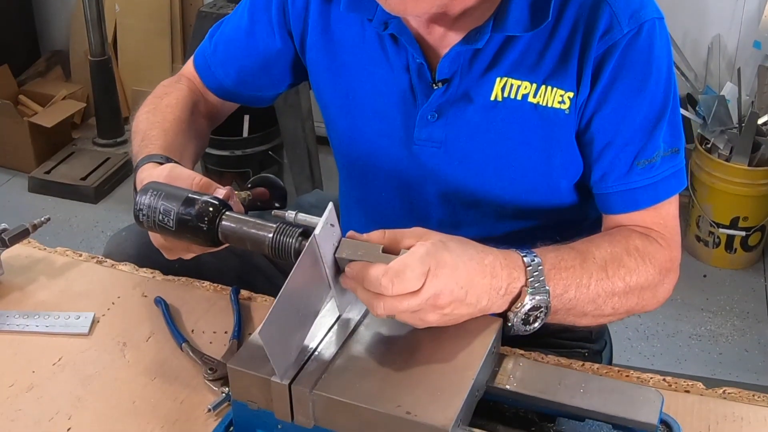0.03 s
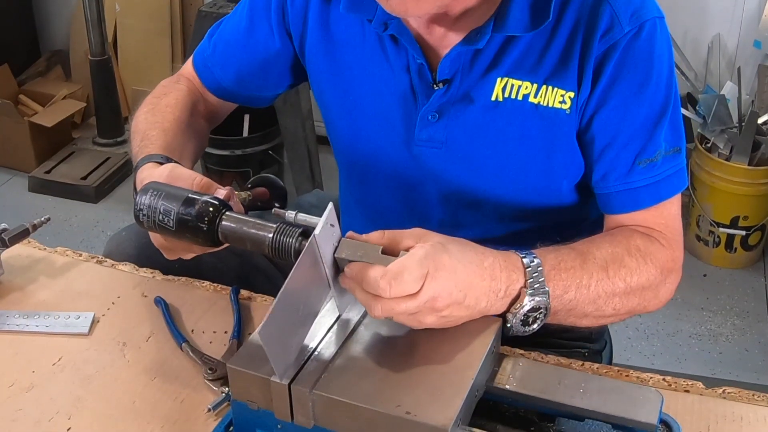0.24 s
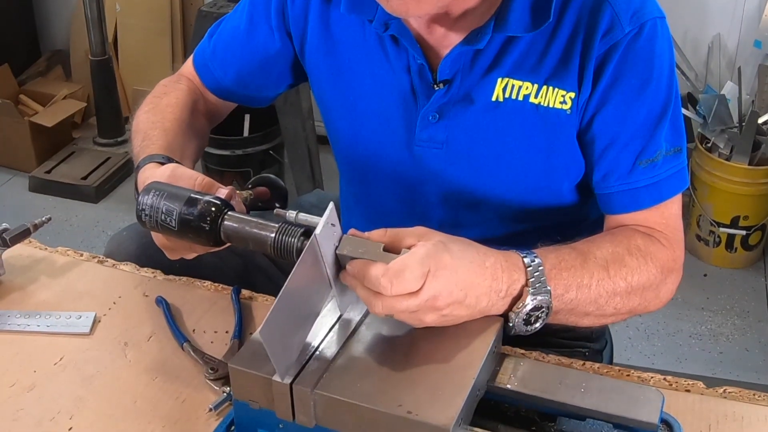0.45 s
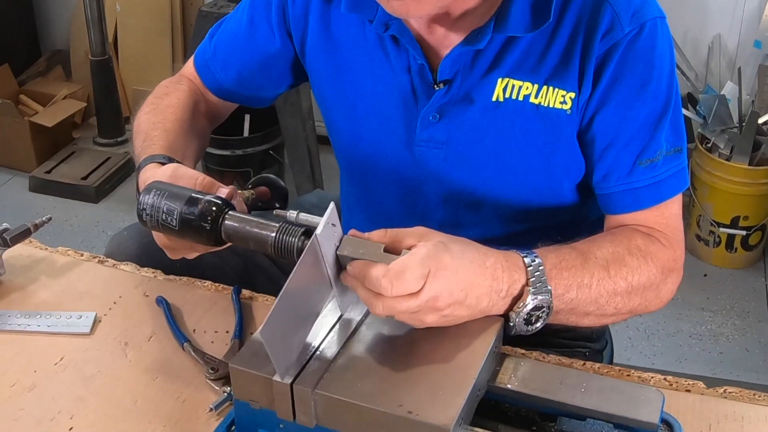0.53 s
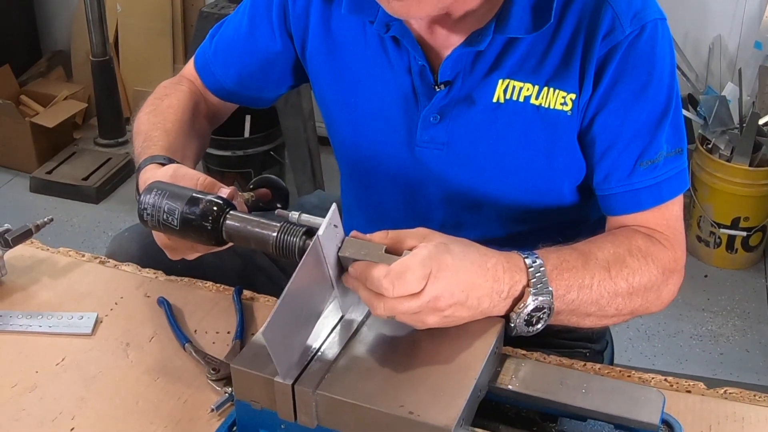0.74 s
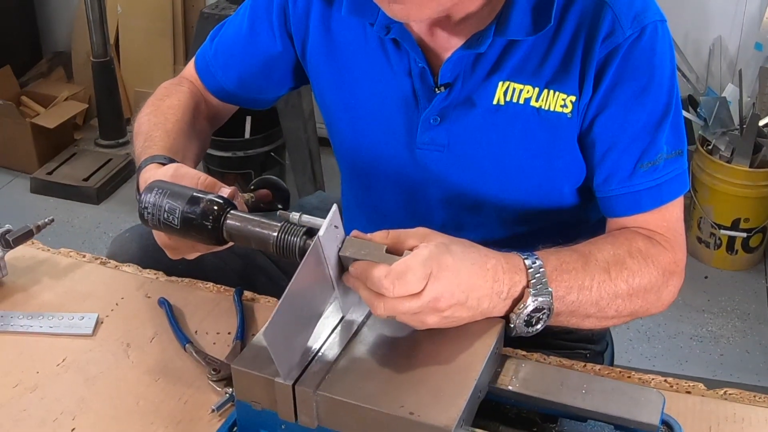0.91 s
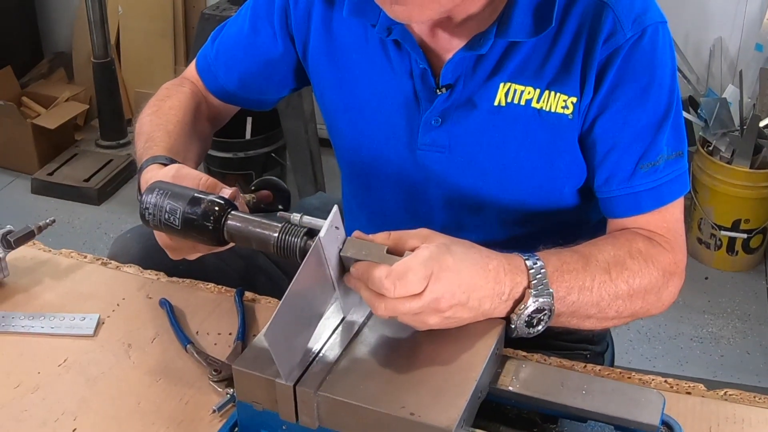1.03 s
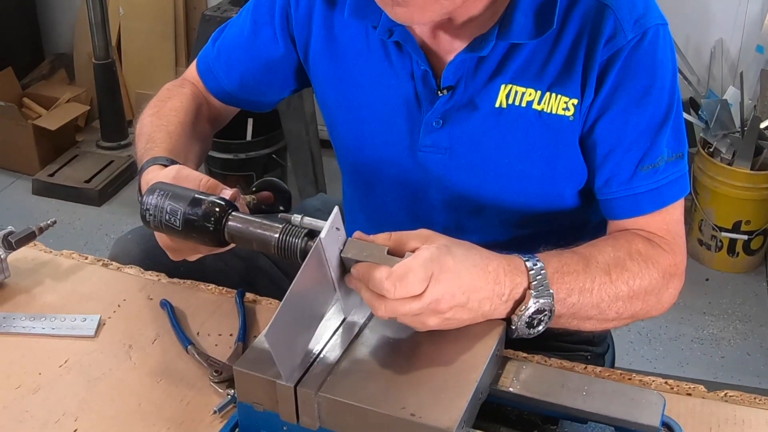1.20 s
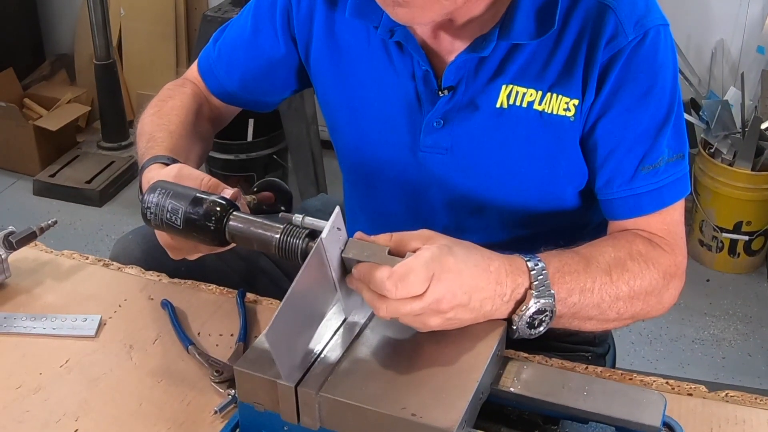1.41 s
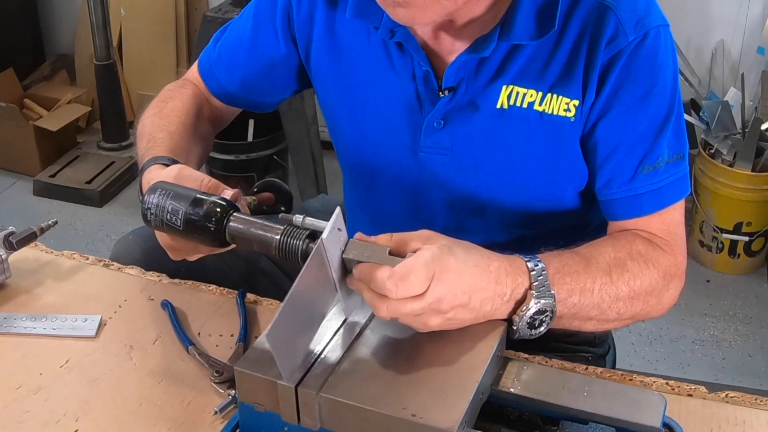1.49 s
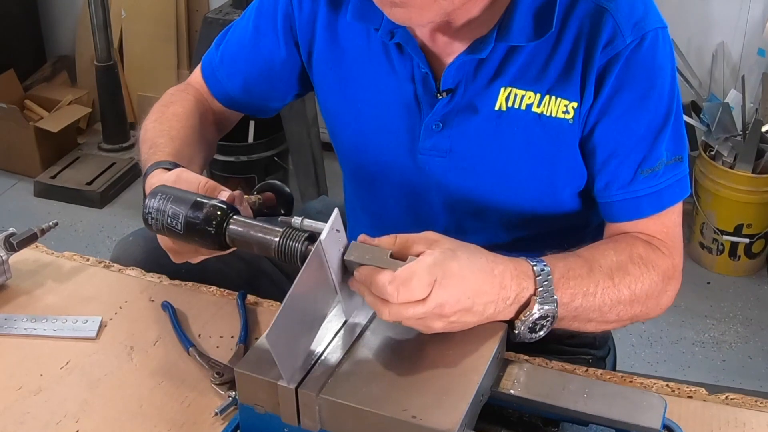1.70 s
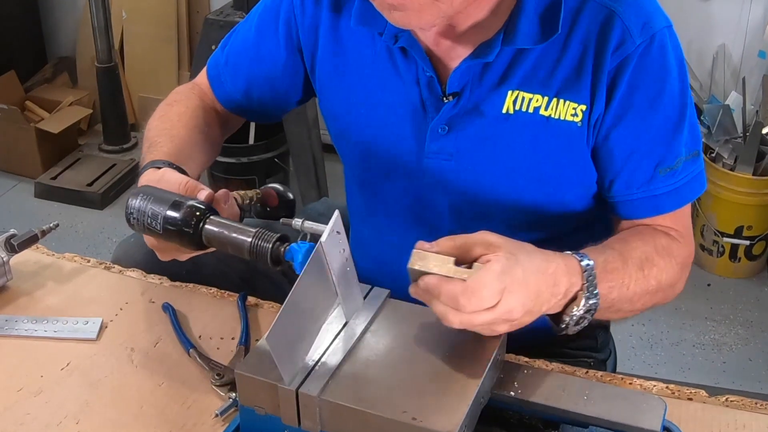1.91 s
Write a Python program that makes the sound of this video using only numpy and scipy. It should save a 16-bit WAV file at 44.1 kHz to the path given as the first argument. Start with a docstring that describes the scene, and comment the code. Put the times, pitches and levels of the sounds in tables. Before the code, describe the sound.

One fast burst of air-powered riveting on sheet metal, ending in a brief ring.

```python
"""A workshop: a pneumatic gun sets a rivet in a small metal sheet, held in a vice against a bucking bar.
The trigger valve leaks and the slack knocks out, then the piston hammers about 26 times a second.
Each cycle is a steel clatter, a spit of hiss and two puffs of air. When the gun stops, the sheet and
the room ring on. The microphone is close, with a limiter holding down the peaks."""
import sys
import numpy as np
from scipy import signal
from scipy.fft import rfft, irfft, next_fast_len
from scipy.io import wavfile
from scipy.ndimage import uniform_filter1d, minimum_filter1d

SR = 44100
rng = np.random.default_rng(int(sys.argv[2]) if len(sys.argv) > 2 else 0)


def unload_wav(signal):
    """Save mono or channel-first audio to the path in sys.argv[1] as 16-bit WAV at rate SR, clipped to [-1, 1]."""
    wavfile.write(
        sys.argv[1],
        SR,
        np.round(np.clip(np.atleast_2d(signal).T, -1, 1) * 32767).astype(np.int16),
    )


N = 85995


def amp(db):
    """Decibels to gain."""
    return 10 ** (np.asarray(db) / 20)


def unit(x):
    """Scale to rms 1."""
    return x / np.sqrt(np.mean(x ** 2) + 1e-20)


def along(points, hz):
    """Read a curve of (Hz, value) points on a log frequency axis."""
    freqs, values = np.transpose(points)
    return np.interp(np.log(hz + 1), np.log(freqs + 1), values)


def filtered(x, response):
    """Filter x by a complex response, given as a function of Hz."""
    size = 2 * next_fast_len(N)
    return irfft(rfft(x, size) * response(np.fft.rfftfreq(size, 1 / SR)), size)[:N]


def coloured(x, eq):
    """Minimum-phase EQ that keeps the power of white noise."""
    def response(hz):
        cepstrum = irfft(np.log(unit(amp(along(eq, hz)))))
        cepstrum[1:len(hz) - 1] *= 2
        cepstrum[len(hz):] = 0
        return np.exp(rfft(cepstrum))
    return filtered(x, response)


def add(track, start, sound):
    """Mix a sound into the track at start seconds."""
    part = track[max(round(start * SR), 0):][:len(sound)]
    part += sound[:len(part)]


# The workshop's noise bed. Each row: frequency in Hz, relative level in dB.
ROOM_TONE_EQ = [(15, -41), (25, -4), (64, -5.5), (98, -11.5), (394, -12.5), (462, -11), (604, -19),
                (15000, -35.5)]
def room_tone(level_db=-54):
    """A quiet, steady bed of dark noise."""
    return amp(level_db) * unit(coloured(rng.standard_normal(N), ROOM_TONE_EQ))


# The reverb's length. Each row: frequency in Hz, seconds to fall 60 dB.
REVERB_T60 = [(100, 0.29), (260, 0.79), (700, 1), (1800, 0.89), (3500, 0.9), (6000, 0.52), (8000, 0.42),
              (13000, 0.23)]
# The reverb's tone. Each row: frequency in Hz, send level in dB.
REVERB_SEND = [(60, -35), (140, -13), (260, 3.5), (450, -17), (1300, -2.5), (2500, -3), (6000, -3),
               (14000, -0.5)]
def workshop_reverb(x, tails=6, predelay_s=0.005):
    """Each frequency dies at its own speed; crossfading tails shift the room as the hands move."""
    out, position = np.zeros(N), np.linspace(0, tails - 1, N)
    for k in range(tails):
        hz, t, noise = signal.stft(rng.standard_normal(SR * 3 // 4), SR, nperseg=256)
        t60 = along(REVERB_T60, hz)[:, None]
        decay = amp(along(REVERB_SEND, hz)[:, None] - 60 * t / t60) * (t > predelay_s)
        equal_energy = np.sqrt(np.log(10 ** 6) / (t60 * SR))
        tail = signal.istft(noise * decay * equal_energy, SR, nperseg=256)[1]
        crossfade = np.maximum(1 - abs(position - k), 0)
        out += signal.fftconvolve(x * crossfade, tail)[:N]
    return out


def knock(centre, width):
    """A round knock: pressure up, down and up again."""
    u = np.clip((np.arange(N) / SR - centre) / width, -10, 10)
    return (u * u - 1) * np.exp(-u * u / 2)


# The slack closing. Each row: time in seconds, thump level in dB, width in seconds, click level in dB.
SLACK_KNOCKS = [(0.2243, -9.5, 0.00073, -23), (.2257, -11, 0.00036, -20.5), (.2345, -46, 0.00048, -22.5),
                (.2531, -10, .0002, -48), (0.263, -12.5, 0.001, -18)]
# The tone of the clicks and the leak. Each row: frequency in Hz, relative level in dB.
CLICK_EQ = [(60, -36), (300, -0.5), (1200, 0.5), (2200, -10), (3600, -2), (6000, -16.5), (14000, -16)]
def take_up(leak_db=-44.5, rise_db_per_s=489, body_hz=330, click_lead_s=0.00106, click_t60=0.024):
    """Air seeps through the opening valve; trigger and rivet set take up slack with knocks and clicks."""
    t, now = np.arange(SR // 10) / SR, np.arange(N) / SR
    first_time, _, first_width, _ = SLACK_KNOCKS[0]
    opening = amp(leak_db + rise_db_per_s * np.minimum(now - first_time, 0))
    leak = opening * (now > 0.194) * (now < 0.28) * rng.standard_normal(N)
    body_ring = amp(-7 - 60 * t / 0.014) * np.sin(2 * np.pi * body_hz * t)  # the gun answers each knock
    thumps, clicks = np.zeros((2, N))
    for time, thump_db, width, click_db in SLACK_KNOCKS:
        thumps += amp(thump_db) * knock(time, width)
        add(thumps, time + width, amp(thump_db) * width / first_width * body_ring)
        click = amp(click_db - 60 * t / click_t60) * rng.standard_normal(len(t))
        add(clicks, time - click_lead_s, click)
    return thumps + coloured(leak + clicks, CLICK_EQ)


def push(centre, width):
    """One swing of air pressure, down then up, of peak 1."""
    u = np.clip((np.arange(N) / SR - centre) / width, -10, 10)
    return u * np.exp((1 - u * u) / 2)


# The piston's rhythm, cueing every layer of the hammering. Each row: start in seconds,
# strength in dB, forward puff trim in dB, return puff trim in dB.
BLOWS = [(0.2795, 2.0, -0.0, 6.0), (0.3188, 0.0, -3.0, 2.0), (0.3572, 0.0, -2.0, 2.0),
         (0.3946, -1.0, 4.0, 1.0), (0.432, -0.0, 4.0, 0.0), (0.47, -1.0, 3.0, 2.0), (0.512, -0.0, 4.0, 2.0),
         (0.5552, 0.0, 1.0, -3.0), (0.5997, 0.0, 1.0, -1.0), (0.6449, 1.0, 1.0, 2.0),
         (0.6894, 0.0, 1.0, 0.0), (0.7333, 0.0, 5.0, 2.0), (0.774, 1.0, 3.0, 2.0),
         (0.8134, -0.0, 2.0, -0.0), (0.8516, -1.0, 1.0, 1.0), (0.8905, 1.0, 2.0, 2.0),
         (0.9283, -1.0, 1.0, -1.0), (0.9671, -0.0, 2.0, -1.0), (1.0031, -1.0, -1.0, 0.0),
         (1.0418, 0.0, -6.0, -0.0), (1.0792, 0.0, 1.0, -0.0), (1.1163, -0.0, 2.0, 2.0),
         (1.1538, -0.0, -1.0, 1.0), (1.1909, 1.0, -1.0, -1.0), (1.2266, -1.0, -7.0, -1.0),
         (1.2642, -0.0, 1.0, -3.0), (1.2999, -1.0, -1.0, 0.0), (1.3373, 0.0, -1.0, -3.0),
         (1.3728, 0.0, -1.0, -3.0), (1.4076, 1.0, 1.0, -0.0), (1.4462, 1.0, -3.0, -1.0),
         (1.4815, 0.0, -4.0, 1.0), (1.5212, -0.0, -6.0, 1.0), (1.559, -1.0, -5.0, -9.0)]
# Exhaust air buffeting the microphone. Each row: frequency in Hz, relative level in dB.
RUMBLE_EQ = [(20, -9), (35, 1.5), (70, -2), (130, -6), (300, -13.5), (800, -90)]
PUFF_DELAY_S, RETURN_DELAY_S = 0.00533, 0.0225
def exhaust(puff_db=-19, return_db=-20.5, recoil_db=-34.5, rumble_db=-35.5, scatter_s=0.00076):
    """A puff of air for each piston stroke, the slow recoil, and a rumble while the gun runs."""
    out, t = np.zeros(N), np.arange(N) / SR
    first_blow, last_blow = BLOWS[0][0], BLOWS[-1][0]
    for start, _, puff_trim, return_trim in BLOWS:
        late, wide = rng.standard_normal((2, 2))
        fade_db = 0.5 * (start - first_blow)  # the stroke shortens as the rivet hardens
        forward = push(start + PUFF_DELAY_S + scatter_s * late[0], 0.00073 * np.exp(0.093 * wide[0]))
        back = push(start + RETURN_DELAY_S + 2 * scatter_s * late[1], 0.00071 * np.exp(0.054 * wide[1]))
        out += amp(puff_db + puff_trim - fade_db) * forward
        out += amp(return_db + return_trim - fade_db) * back
        out += amp(recoil_db) * push(start + 0.012, width=0.0047)
    running = (t > first_blow) & (t < last_blow + RETURN_DELAY_S)
    return out + amp(rumble_db) * coloured(running * rng.standard_normal(N), RUMBLE_EQ)


# The bright exhaust hiss. Each row: frequency in Hz, relative level in dB.
SPIT_EQ = [(100, -61), (2500, -13), (4500, -2), (6200, 0.5), (8300, -6.5), (12800, -5.5), (15700, -15)]
def spits(level_db=-26.5, hold_s=0.0071, t60=0.11):
    """A short hiss of exhaust air with each blow."""
    out, t = np.zeros(N), np.arange(SR // 10) / SR
    envelope = amp(level_db - 60 * np.maximum(t - hold_s, 0) / t60)
    for start, blow_db, _, _ in BLOWS:
        add(out, start, amp(blow_db) * envelope * rng.standard_normal(len(t)))
    return coloured(out, SPIT_EQ)


# The clamped sheet's long modes. Each row: pitch in Hz, relative level in dB, seconds to fall 60 dB.
SHEET_MODES = [(565, -16, .8), (888, -12, .5), (1070, -12, .6), (1265, -6, .6), (1340, -8, .5),
               (1432, 0, .45), (1782, -9, .65), (2126, 2, .65), (2331, -7, .4), (2670, -11, .4),
               (2848, -9, .4), (3050, -9, .3), (3170, -12, .3), (4296, -14, .4), (4710, -14, .42),
               (5992, -14, .34)]
# The ring's fader ride as the rivet tightens. Each row: time in seconds, gain in dB.
SHEET_RIDE = [(.28, -24), (.58, 3), (.66, 11), (.8, -8.5), (1.2, 5), (1.42, 6.5), (1.56, 6)]
def sheet_and_bench(sheet_db=-39, detune=0.00297, bench_hz=275, bench_db=-24, bench_t60=0.03):
    """Every blow rings the sheet anew, and the vice and bench boom under it."""
    t, out = np.arange(SR * 3 // 5) / SR, np.zeros(N)
    hz, mode_db, t60 = np.transpose(SHEET_MODES)[:, :, None]
    fades = amp(mode_db - 60 * t / t60)
    boom = amp(bench_db - 60 * t / bench_t60) * np.sin(2 * np.pi * bench_hz * t)
    for start, blow_db, _, _ in BLOWS:
        phase, grip = rng.standard_normal((2, len(SHEET_MODES), 1))
        pitch = hz * (1 + detune * grip)  # the grip shifts the modes from blow to blow
        ring = np.sum(fades * np.sin(2 * np.pi * (pitch * t + phase)), axis=0)
        ride_db = np.interp(start, *np.transpose(SHEET_RIDE))
        add(out, start, amp(sheet_db + blow_db + ride_db) * ring)
        add(out, start + PUFF_DELAY_S, amp(blow_db) * boom)
    return out


# The freed sheet's modes. Each row: pitch in Hz, level in dB, seconds to fall 60 dB.
FREE_MODES = [(570, -43, 1.0), (620, -22, .06), (645, -45, .8), (889, -28, .7)]
def sheet_release(start=1.571):
    """The sheet sings out when the gun lets go."""
    out, t = np.zeros(N), np.arange(SR // 2) / SR
    for hz, db, t60 in FREE_MODES:
        add(out, start, amp(db - 60 * t / t60) * np.sin(2 * np.pi * hz * t))
    return out


def rattle(t60, alike, swell_s=0.016, swell_db=3.5, spiky_db=3.5):
    """Dense rebounds build and die after each blow; the share `alike` repeats from blow to blow."""
    t, out = np.arange(SR // 10) / SR, np.zeros(N)
    envelope = amp(swell_db * np.minimum(t / swell_s - 1, 0) - 60 * np.maximum(t - swell_s, 0) / t60)
    def contacts():
        noise = rng.standard_normal(len(t))
        spikes = unit(uniform_filter1d(rng.standard_normal(len(t)), size=30))
        return unit(noise * amp(spiky_db * spikes))
    common = contacts()
    for k, (start, blow_db, _, _) in enumerate(BLOWS):
        accent_db = 3 if k == 0 else 0  # the first stroke has the full line pressure
        burst = np.sqrt(alike) * common + np.sqrt(1 - alike) * contacts()
        add(out, start, amp(blow_db + accent_db) * envelope * burst)
    return out


# The tools' steel ring. Each row: pitch in Hz, bandwidth in Hz, relative level in dB.
STEEL_MODES = [(1215, 36, -1.5), (1414, 44, -2.5), (2114, 60, -1.5), (2453, 83, -10), (2814, 10, 2),
               (3048, 32, 2), (3198, 23, 3), (3930, 300, -9), (4860, 19, -7), (5660, 29, -2),
               (5590, 43, -7), (6700, 30, -10.5), (9640, 160, -9.5), (11480, 43, -11), (12800, 240, -11)]
def steel_ring(level_db=-30.5):
    """The contacts ring the short resonances of gun, rivet set and bar."""
    def resonances(hz):
        return sum((-1) ** k * amp(db) * 1j * hz * width / (pitch ** 2 - hz ** 2 + 1j * hz * width)
                   for k, (pitch, width, db) in enumerate(STEEL_MODES))
    return amp(level_db) * unit(filtered(rattle(t60=0.1, alike=0), resonances))


# The clatter's tone. Each row: frequency in Hz, relative level in dB.
CLATTER_EQ = [(59, -27), (100, -12), (271, -6), (533, -2.5), (1380, -5.5), (1900, -9), (2160, -12.5),
              (2560, -7.5), (3160, -11), (3440, -13), (4620, -14), (5600, -13.5), (8920, -16), (12800, -22),
              (15800, -20)]
# Pings after a blow. Each row: delay to the peak in seconds, pitch in Hz, width in seconds, level in dB.
PINGS = [(.0075, 5600, .0009, -19), (.0095, 6400, .0012, -22), (.0132, 2250, .0016, -17)]
def hammering(clatter_db=-21, delay_scatter=0.12, detune=0.0305):
    """The steel contacts heard directly, with three brief pings after each blow."""
    t = np.arange(SR // 30) / SR
    out = amp(clatter_db) * coloured(rattle(t60=0.08, alike=0.16), CLATTER_EQ)
    for start, blow_db, _, _ in BLOWS:
        for delay, hz, width, ping_db in PINGS:
            late, sharp, louder, phase = rng.standard_normal(4)
            swell = np.exp(-((t - delay * (1 + delay_scatter * late)) / width) ** 2 / 2)
            tone = np.sin(2 * np.pi * (hz * (1 + detune * sharp) * t + phase))
            add(out, start, amp(blow_db + ping_db + 2 * louder) * swell * tone)
    return out


def scene():
    """Gun and sheet feed the reverb; the sheet's release and the room tone go in dry. Mono."""
    riveting = hammering() + spits() + exhaust() + take_up() + steel_ring() + sheet_and_bench()
    return (riveting + workshop_reverb(riveting) + sheet_release() + room_tone())[None]


def record(dry, threshold_db=-7.2, hold_s=0.003, top_hz=15700):
    """A fast limiter, then a brick-wall high cut."""
    hold = int(hold_s * SR)
    needed_gain = np.minimum(1, amp(threshold_db) / (abs(dry[0]) + 1e-9))
    gain = uniform_filter1d(minimum_filter1d(needed_gain, hold), hold)
    return filtered(dry[0] * gain, lambda hz: hz < top_hz)[None]


dry = scene()
out = record(dry)
unload_wav(out)
```